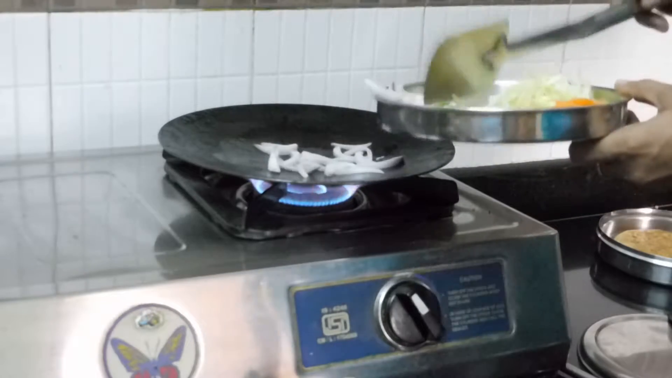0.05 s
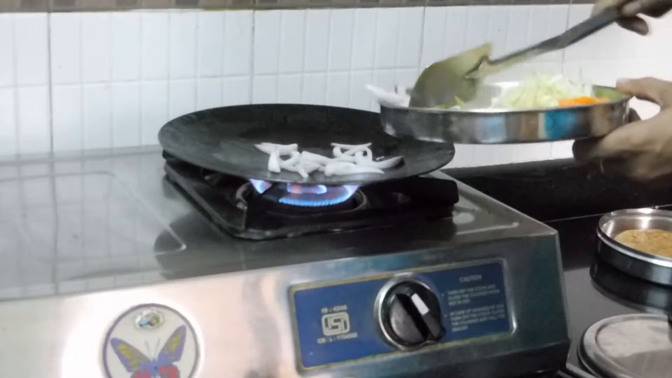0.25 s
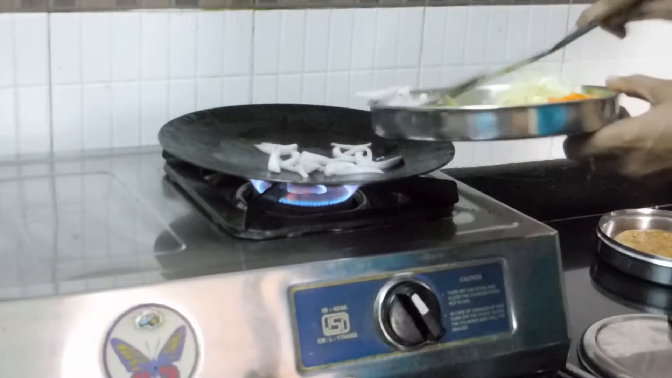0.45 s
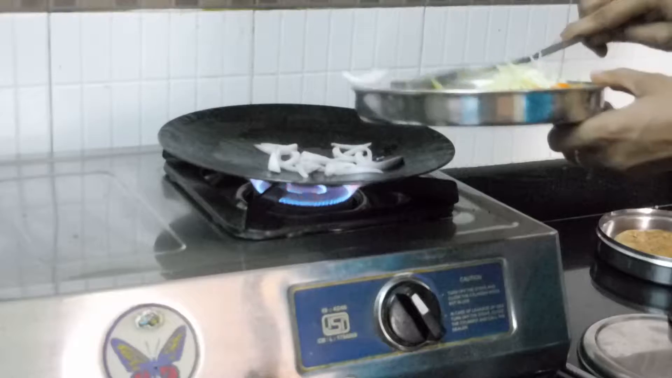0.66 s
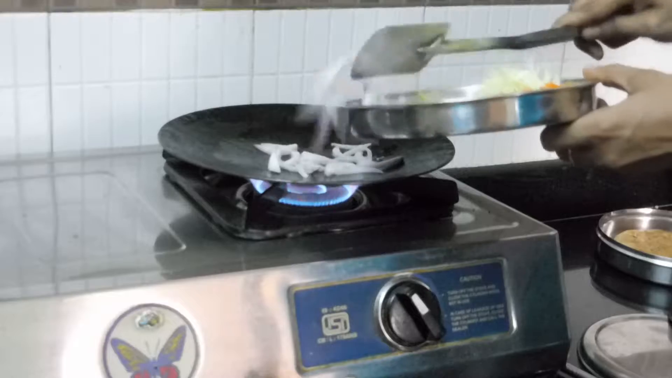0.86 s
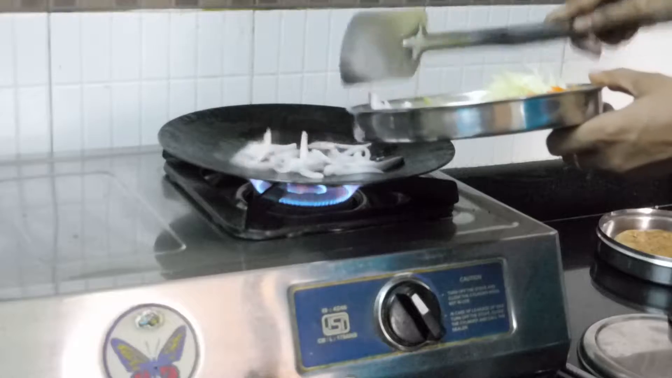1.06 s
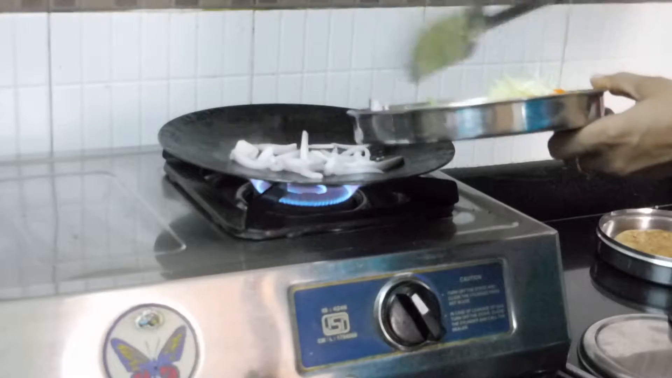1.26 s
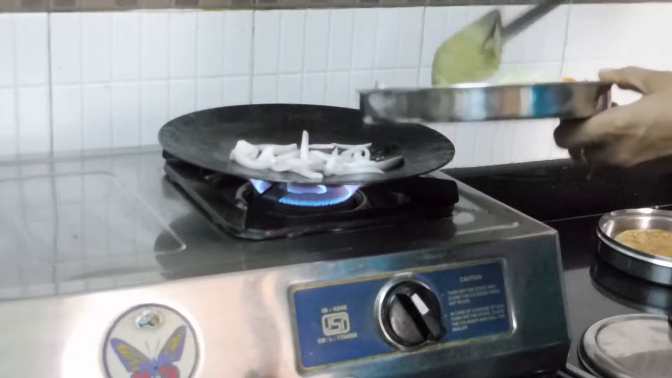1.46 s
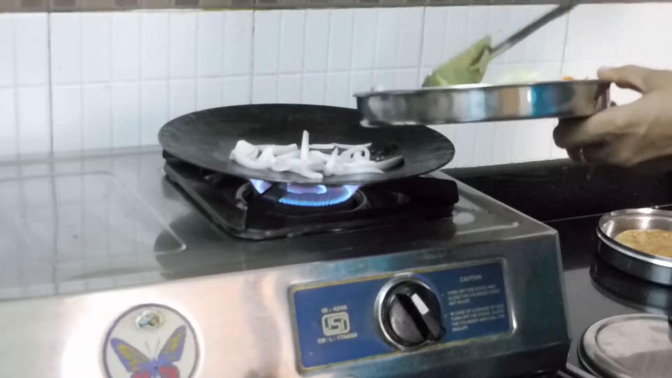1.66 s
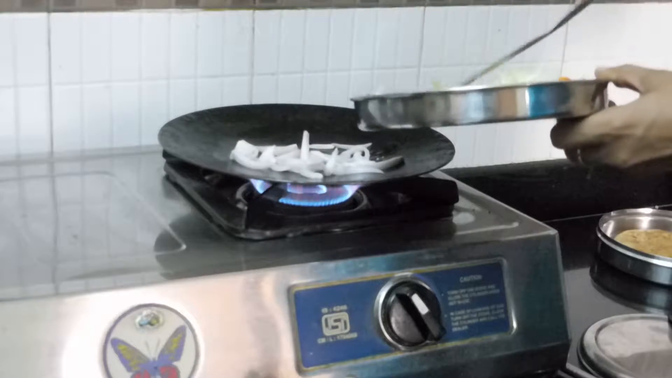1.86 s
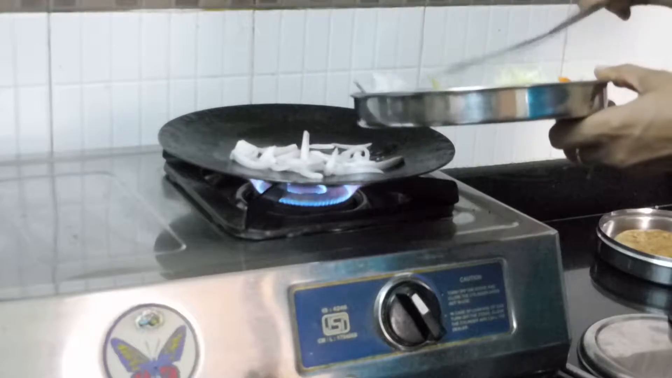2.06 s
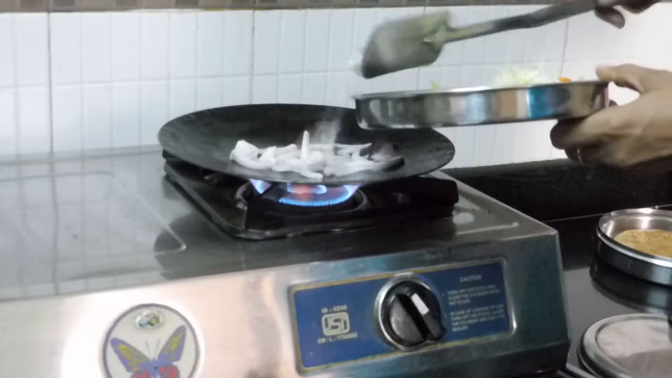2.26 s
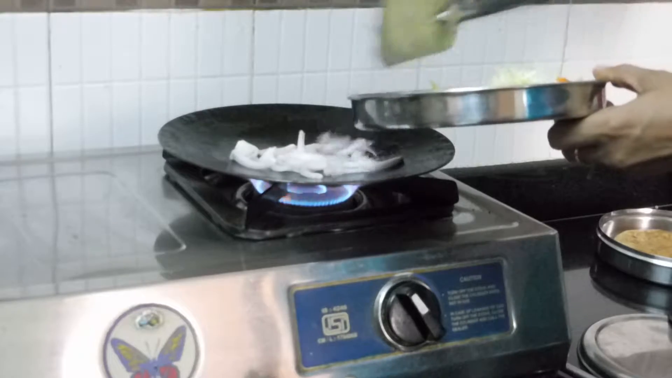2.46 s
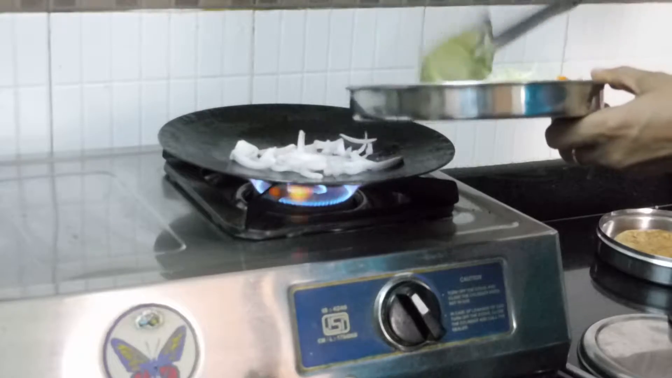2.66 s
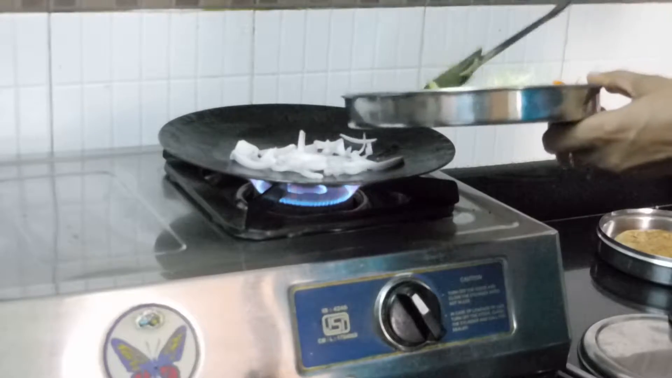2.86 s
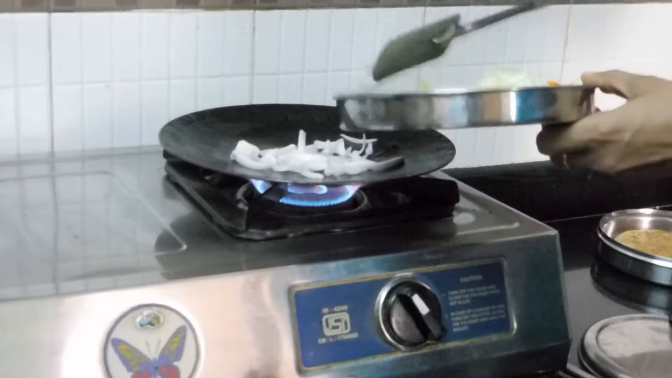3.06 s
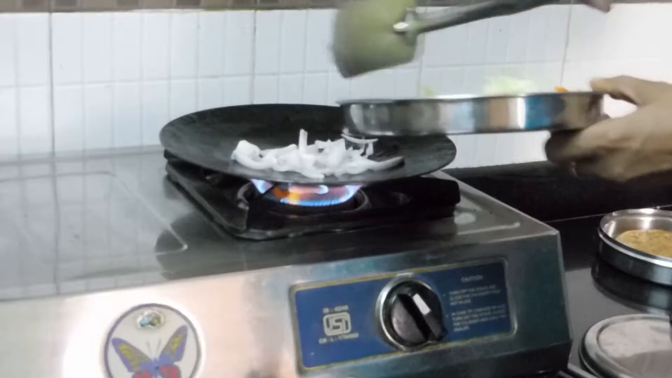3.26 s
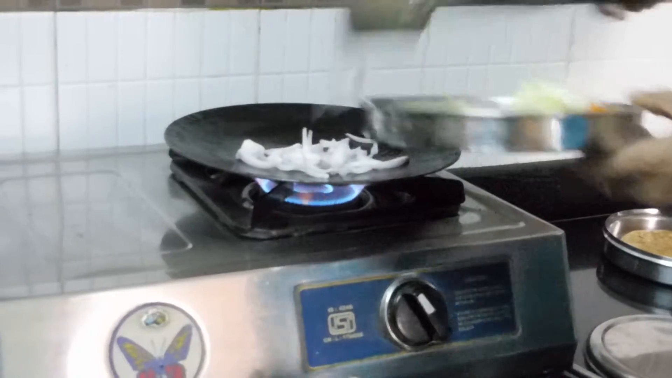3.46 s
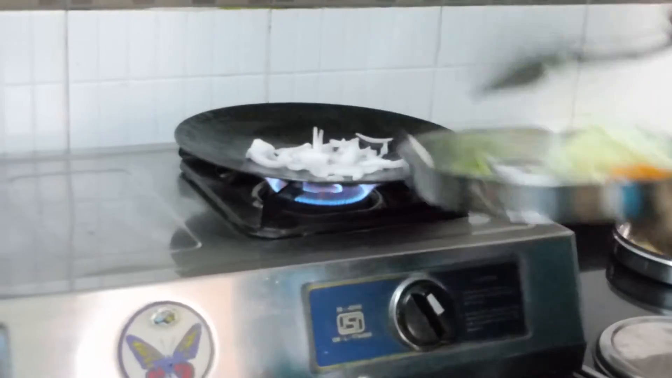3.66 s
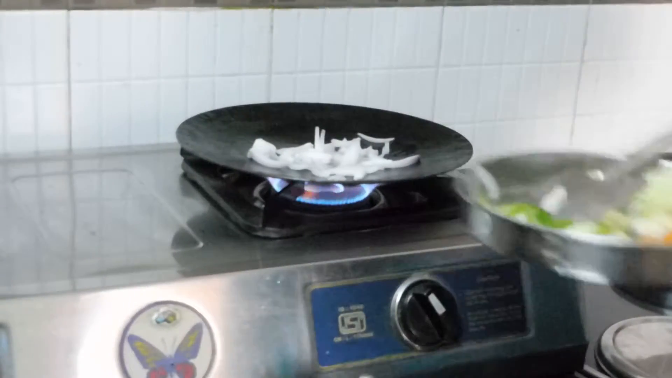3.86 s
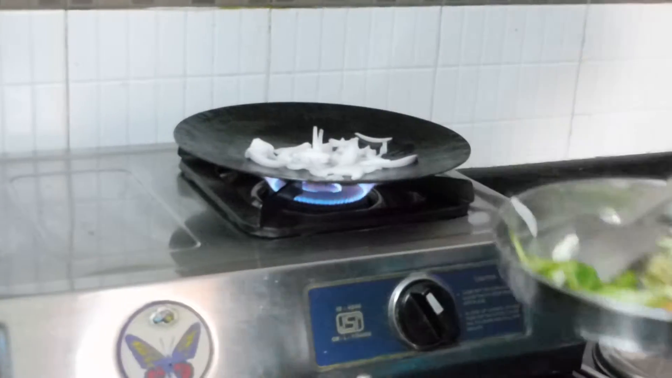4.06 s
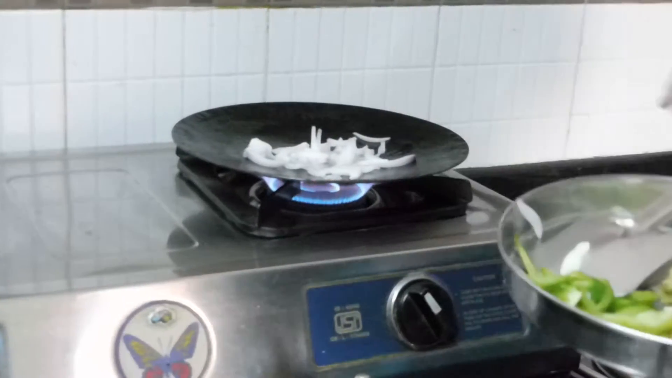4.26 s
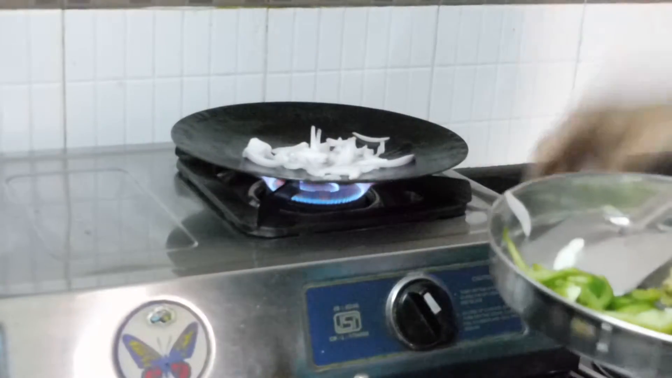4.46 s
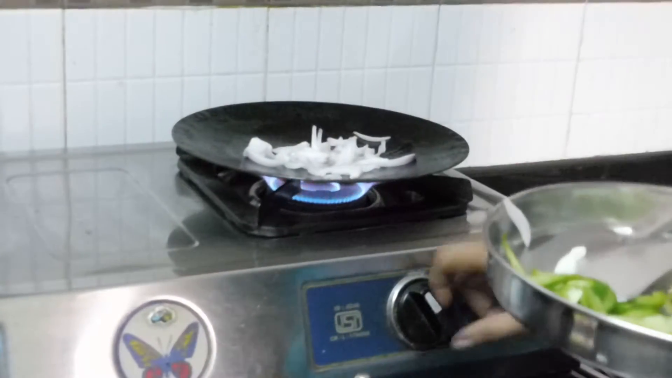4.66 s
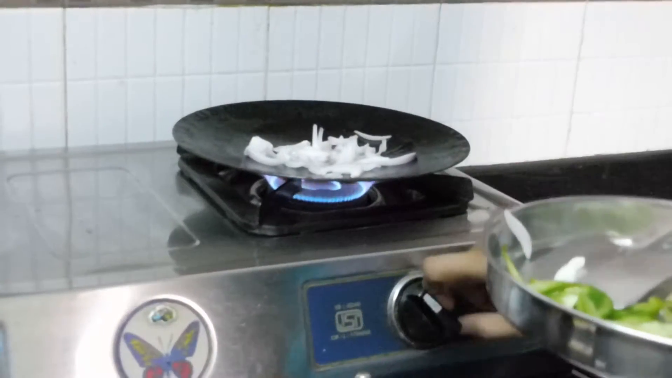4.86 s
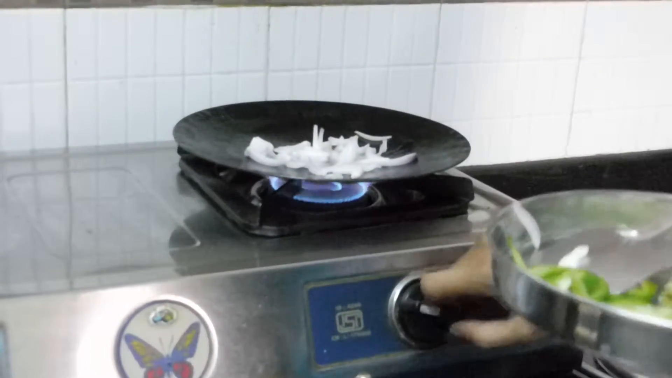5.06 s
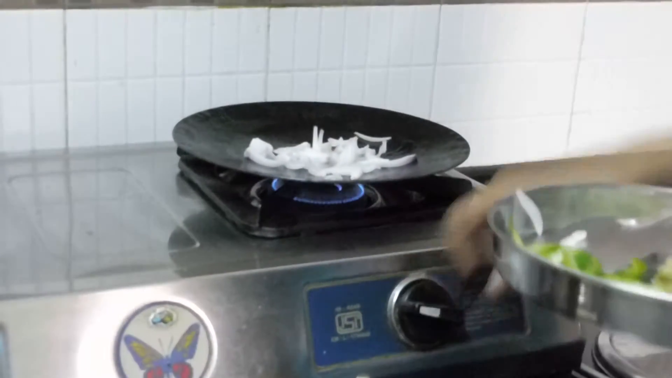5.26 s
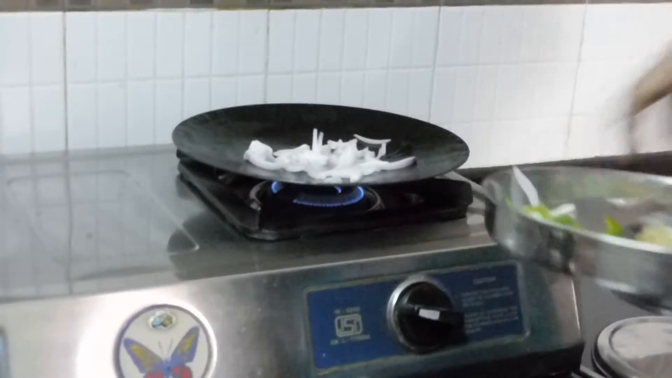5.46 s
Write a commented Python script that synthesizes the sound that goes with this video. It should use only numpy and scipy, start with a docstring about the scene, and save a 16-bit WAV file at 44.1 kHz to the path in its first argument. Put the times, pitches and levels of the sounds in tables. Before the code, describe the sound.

A close stereo view of frying in a small tiled kitchen. It begins with a light, fine sizzle, a soft spatula rustle near 0.1 s and a cluster of crisp popping drops from 0.3 to 1.1 s. At about 1.0 s the onion makes the sizzle leap into a dense, bright hiss, strong until 1.7 s. A crunchy scoop and dull tray knocks come near 1.5 s. From 1.9 s wet slices crack and spit sharply, with another surge around 2.6 s and many hard pops until 3.7 s. A steel tray clacks at 3.8-3.9 s as shreds rustle. The sizzle then fluctuates, thinner around 5.1 s, with scattered snaps and a spit at 5.35 s. Faint throaty dove coos come from outside at 1.7-2.4 and 3.7-4.2 s. A very quiet gas murmur and barely audible low bumps lie underneath.

```python
"""Sizzling oil on a flat iron pan takes sliced onion pushed off a steel tray, over a gas ring in a tiled kitchen.
The sizzle is dense random bubble bursts; drops pop with click, tear and ring; wet slices crack, spray and slap.
The spatula rustles in shredded vegetables as filtered grains and knocks the tray's decaying modes.
A dove outside coos in two calls of gliding sines, shaped noise makes the flame's murmur, and low thuds bump."""
import sys
import numpy as np
from scipy import signal
from scipy.fft import rfft, irfft, next_fast_len
from scipy.io import wavfile
from scipy.ndimage import uniform_filter1d, minimum_filter1d

SR = 44100
rng = np.random.default_rng(int(sys.argv[2]) if len(sys.argv) > 2 else 0)


def transcribe(signal):
    """Save signal, clipped to [-1, 1], as a 16-bit WAV file at the path in sys.argv[1]."""
    frames = np.atleast_2d(signal).T
    limited = np.clip(frames, -1, 1)
    pcm = np.round(limited * 32767).astype(np.int16)
    wavfile.write(sys.argv[1], SR, pcm)


N = 243431
TIME = np.arange(N) / SR
SPOTS = 14  # places on the pan, each with its own path through the kitchen

# All levels are relative, ahead of layer gains and room.
# vigour of the frying: start_s, fine_sizzle_db, coarse_bubbling_db
FRYING_VIGOUR = [(0.0, -29.5, -48.5), (0.17, -32.5, -50.5), (0.45, -33.5, -49.5), (0.73, -32, -44),
                 (0.79, -33.5, -53), (0.89, -31, -45), (0.97, -28.5, -53), (1.04, -20, -39),
                 (1.08, -21, -42), (1.2, -20, -34.5), (1.3, -22, -50), (1.4, -21.5, -43), (1.6, -22, -47),
                 (1.85, -26.5, -43.5), (2.0, -27.5, -49), (2.32, -26.5, -49.5), (2.64, -22, -38),
                 (2.9, -27, -47), (3.22, -27.5, -43), (3.44, -26, -46), (3.69, -29.5, -47),
                 (4.03, -27, -41), (4.13, -31, -48), (4.21, -30, -46), (4.46, -27, -49.5),
                 (4.66, -31, -50.5), (5.08, -35, -48), (5.52, -29, -51)]
# the loudest single drops popping: start_s, level_db, cavity_pitch_hz, dull_tap_on_iron_db
POPPING_DROPS = [(0.0566, -25, 11000, -47), (0.33, -19, 11000, -53), (0.3324, -10, 6200, -52),
                 (0.3434, -6, 11500, -37), (0.3678, -16, 12000, -42), (0.416, -21, 7650, -63),
                 (0.4831, -19, 5870, -57), (0.5584, -8, 10700, -37), (0.6076, -14, 9400, -54),
                 (0.669, -14, 10000, -50), (0.6931, -5.5, 11800, -32.5), (0.712, -19, 9450, -42),
                 (0.816, -11, 7850, -53), (0.8172, -4.5, 10900, -38), (0.8659, -17, 8000, -56),
                 (0.8988, -12, 4730, -56), (0.9117, -8, 11500, -52), (0.9614, -4, 10000, -54),
                 (1.033, -3, 7300, -28.5), (1.0824, -1, 10900, -34), (1.943, -1.5, 10500, -57),
                 (1.96, -11, 11500, -52), (2.156, -9, 11500, -54), (2.2, -4, 9500, -52),
                 (2.391, -3, 10800, -35), (2.7814, -1, 10400, -46), (2.93, -3, 10800, -40),
                 (2.961, -4, 10100, -44), (3.0297, 0, 12100, -50), (3.0614, -4, 10600, -56),
                 (3.1296, -6.5, 11000, -32), (3.3024, -10, 11300, -57), (3.3624, -3, 10100, -31),
                 (3.5933, -4.5, 9900, -59), (3.6935, -6, 11500, -50), (4.1585, -17, 8000, -37),
                 (4.2823, -0.5, 11500, -40), (4.4028, -11, 11300, -50), (4.785, -18, 9400, -56),
                 (4.8421, -10, 11000, -53), (4.9642, -21.5, 10800, -60), (4.9852, -20, 9500, -52),
                 (5.1173, -13, 10800, -47), (5.269, -23, 11400, -57)]
# water flashing to steam: start_s, crack_db, spray_db, spray_length_s, slap_on_iron_db, coarse_splutter_db
STEAM_SPITS = [(0.344, -32, -36, 0.025, -42, -42), (0.481, -20, -31, 0.028, -60, -35),
               (0.913, -18, -38, 0.014, -45, -31.5), (1.385, -20.5, -18, 0.01, -40.5, -51),
               (1.449, -23, -20, 0.012, -63, -55), (1.901, -5, -26, 0.032, -44, -33.5),
               (1.959, -28, -19, 0.021, -55, -51), (2.0598, -11.5, -22, 0.026, -35.5, -32),
               (2.2396, -4, -32, 0.032, -32.5, -35), (2.4255, -4, -16, 0.034, -33.5, -36),
               (2.619, -13, -18, 0.017, -36, -39), (2.763, -8.5, -19, 0.021, -34, -36),
               (3.172, -7, -23.5, 0.05, -48, -47), (3.494, -15, -24, 0.045, -36, -36),
               (3.5358, -8, -10.5, 0.02, -32, -52), (3.998, -22, -22, 0.032, -54, -42),
               (4.159, -16, -26, 0.032, -42, -43), (4.3115, -15, -27, 0.034, -39, -33),
               (4.845, -36, -28.5, 0.037, -45, -57), (5.352, -8.5, -19.5, 0.038, -35, -43)]
# the iron pan's ringing modes: pitch_hz, level_db, t60_s
PAN_MODES = [(366, -62, .4), (698, -60, .3), (869, -58, .4), (1110, -54, .25), (1326, -57, .2),
             (2662, -57, .4), (3222, -60, .25), (4009, -59, .25)]
# spatula strokes through the shredded vegetables: middle_s, level_db, half_length_s
SPATULA_STROKES = [(.14, -31.5, 0.089), (1.53, -25, 0.048), (2.69, -47, 0.032), (3.965, -21, 0.1)]
# spatula and tray knocking: start_s, level_db, brightness_hz, scrape_length_s, scrape_db, place (0 floor to 1 rim)
TRAY_KNOCKS = [(0.087, -40, 1500, 0.041, -4, 0), (1.475, -28.5, 1550, 0.042, 0.5, 0.055),
               (1.567, -35.5, 1300, 0.011, -5, 0.3), (1.67, -37, 2200, 0.023, -3, 0.52),
               (2.618, -41, 2500, 0.02, 4.5, 0.14), (2.654, -40.5, 2440, 0.018, 4, 0.1),
               (2.764, -37.5, 2700, 0.054, -2, 0.45), (3.174, -42.5, 2520, 0.017, -15, 0.39),
               (3.494, -41, 2400, 0.019, 8, 0.55), (3.8238, -31.5, 4600, 0.0055, -4, 1),
               (3.8816, -35, 4770, 0.0041, -1, 0.72), (3.949, -37, 3000, 0.043, -3, .6)]
# modes of the loaded steel tray, the dB columns weighted by place: pitch_hz, floor_db, rim_db, t60_s
TRAY_MODES = [(262, -9.5, -22, 0.14), (695, -17, 8, 0.08), (807, -8, -20, .1), (900, -10, -20, 0.08),
              (1055, -5, -14, .1), (1130, -9, -2, 0.08), (1293, -12, 1, 0.05), (1739, -4, -10, 0.055),
              (1890, -6, -3, 0.06), (2227, -2, -6, 0.035), (2600, 3, -4, 0.06), (2848, 1, 0, 0.05),
              (3098, 3, -1, 0.035), (3550, 3, 5, 0.03), (3680, 3, 4, .035), (4050, 4, 1, .03),
              (4400, 3, 3, .035), (5000, 3, 3, .025), (5470, 3, 3, .035), (6110, 2, 0, .025),
              (6966, 3, 4, 0.025), (11200, 17, 17, 0.03)]
# the dove's notes: start_s, length_s, pitch_hz, level_db, octave_db, throatiness (0 to 1)
DOVE_NOTES = [(1.728, .17, 532, -48, -16, .9), (2.075, .18, 563, -44, -13, .8),
              (2.275, .155, 570, -47.5, -17, .6), (3.728, .18, 558, -45.5, -8, .75),
              (4.02, .14, 581, -39.5, -22, .2)]
# dull bumps of tray and gas knob: middle_s, level_db, half_length_s
DULL_BUMPS = [(3.607, -60, 0.079), (5.085, -53.5, 0.046), (5.257, -62, 0.048)]
# spectrum of fine bursting bubbles and droplets: frequency_hz, density_db (per Hz)
SIZZLE_SPECTRUM = [(150, -25.5), (500, -41.5), (1200, -24.5), (2500, -17), (4500, -11), (7000, -5.5),
                   (9500, 0), (11500, 3), (13500, 0.5), (15800, -9.5)]
# spectrum of coarse bubbling beneath the slices: frequency_hz, density_db (per Hz)
BUBBLING_SPECTRUM = [(150, -18), (400, -12.5), (800, -12), (1400, -5.5), (2200, -2.5), (3300, -3.5),
                     (5000, 3), (9000, -13.5), (15000, -38)]
# spectrum of a water pocket cracking open: frequency_hz, density_db (per Hz)
CRACK_SPECTRUM = [(100, -21), (400, -18.5), (1000, -18.5), (2500, -3.5), (5000, 1.5), (10500, 4.5),
                  (13000, -0.5), (16000, 1)]
# spectrum of a popping drop: frequency_hz, density_db (per Hz)
POP_SPECTRUM = [(100, -9.5), (500, -15.5), (1500, -12), (3500, -1.5), (7000, 5), (11000, 8.5), (13500, 6.5),
                (16000, 7)]
# spectrum of crisp shreds rustling: frequency_hz, density_db (per Hz)
RUSTLE_SPECTRUM = [(150, -17.5), (800, -15), (2500, -4), (5000, -2.5), (11000, 5), (16000, 2.5)]
# spectrum of the gas flame: frequency_hz, density_db (per Hz)
FLAME_SPECTRUM = [(20, 1), (50, -7), (75, -7.5), (98, -1.5), (130, -10.5), (250, -6.5), (400, -3.5),
                  (800, -6.5), (1200, -6), (3000, -61), (8000, -43)]
# colour between the microphones, left fuller in bass and top: frequency_hz, left_minus_right_db
EAR_DIFFERENCE = [(50, 3), (300, -.5), (4000, -1.3), (9500, -0.7), (13500, 1.1)]


def sizzle(fine_gain_db=0.65, coarse_gain_db=0.94):
    """Fine bursts at the rim of each slice, coarser bubbling trapped beneath; both come in flurries."""
    fine_db, coarse_db = in_time(FRYING_VIGOUR)
    flurry_db = 1.3 * drift(rate=50)
    fine = colour(bursts(grains(per_s=5500, spread_db=4.0), cycles=2.2), SIZZLE_SPECTRUM)
    coarse = colour(deal(grains(per_s=2500, spread_db=3.0)), BUBBLING_SPECTRUM)
    fine_level = from_db(fine_db + flurry_db + fine_gain_db)
    coarse_level = from_db(coarse_db + flurry_db + coarse_gain_db)
    return fine_level * fine + coarse_level * coarse


def bursts(clicks, cycles):
    """Bubbles ring for a few cycles at the pitch of their spot; the spots sum to unit power."""
    pitches_hz = np.linspace(2500, 15000, SPOTS)
    rings = [ring(row, hz, cycles / hz) for row, hz in zip(deal(clicks), pitches_hz)]
    return rms_one(np.array(rings)) / np.sqrt(SPOTS)


def crackle(per_s=60, level_db=-11.0, spread_db=4.0, follows=0.65):
    """Stray droplets snap on the bare iron, harder as the frying grows."""
    vigour_db, _ = in_time(FRYING_VIGOUR)
    swing_db = follows * (vigour_db - vigour_db.mean())
    sizes = from_db(level_db + swing_db + spread_db * rng.standard_normal(N))
    sizes = sizes * rng.choice([-1, 1], N)
    snaps = sizes * (rng.random(N) < per_s / SR)
    return colour(deal(snaps), SIZZLE_SPECTRUM)


def pops(gain_db=8.5, ring_share=1.0, cycles=7.0, tear_share=0.2, tear_s=0.00068, size=512):
    """A drop bursts with a sharp click, its skin tears for a millisecond and its cavity rings briefly."""
    out, age = np.zeros((SPOTS, N)), np.arange(size) / SR
    for k, (s, db, hz, _) in enumerate(POPPING_DROPS):
        tear = tear_share * rng.standard_normal(size) * np.exp(-age / tear_s)
        cavity = ring_share * np.cos(2 * np.pi * hz * age) * from_db(-60 * age * hz / cycles)
        start = round(s * SR)
        out[k % SPOTS, start:start + size] += from_db(db + gain_db) * ((age == 0) + tear + cavity)
    return colour(out, POP_SPECTRUM)


def cracks(tear_share=0.12, tear_s=0.00088, gain_db=19.5):
    """A pocket of water tears open with a full-range crack."""
    out, tear = np.zeros((SPOTS, N)), tear_share * rng.standard_normal(N)
    for k, (s, db, *_) in enumerate(STEAM_SPITS):
        out[k % SPOTS] += from_db(db + gain_db) * (click(s) + tear * fade(s, tear_s))
    return colour(out, CRACK_SPECTRUM)


def sprays():
    """Each crack throws a dying spray of droplets over the iron while the slice splutters coarsely beneath."""
    spray, splutter = 0, 0
    for s, _, spray_db, length, _, splutter_db in STEAM_SPITS:
        dying = fade(s, length)
        spray = spray + from_db(spray_db) * dying
        splutter = splutter + from_db(splutter_db) * dying
    droplets = colour(deal(grains(per_s=7000, spread_db=3.5)), SIZZLE_SPECTRUM)
    bubbles = colour(deal(grains(per_s=2500, spread_db=3.0)), BUBBLING_SPECTRUM)
    return spray * droplets + splutter * bubbles


def taps(gain_db=30, top_hz=2200, slap_s=0.0047, slap_smear=0.056):
    """Popping drops tap the iron dully; spitting slices slap it, landing over a few milliseconds."""
    smear = slap_smear * rng.standard_normal(N)
    blows = sum(from_db(db) * click(s) for s, *_, db in POPPING_DROPS)
    blows += sum(from_db(db) * (click(s) + smear * fade(s, slap_s)) for s, *_, db, _ in STEAM_SPITS)
    return from_db(gain_db) * band(blows + 1e-18, 200, top_hz)


def pan(frying):
    """The frying shakes the iron plate into a faint ring."""
    return sum(from_db(db) * ring(frying, hz, t60) for hz, db, t60 in PAN_MODES)


def scoops():
    """Crisp shreds crunch and slip under each stroke of the spatula."""
    return swells(SPATULA_STROKES) * colour(grains(per_s=4500, spread_db=6.0), RUSTLE_SPECTRUM)


def tray(clack_db=26, ring_db=5.5):
    """Knocks and slips clack and ring the tray's modes; soft contacts favour low modes, hard ones high."""
    slips = grains(per_s=2000, spread_db=2.0)
    contacts = []
    for s, db, _, length, scrape_db, _ in TRAY_KNOCKS:
        scrape = from_db(scrape_db) * slips * fade(s, length) / np.sqrt(length * SR)
        contacts.append(from_db(db) * (click(s) + scrape))
    contacts = np.array(contacts)
    bright_hz, rim = np.array(TRAY_KNOCKS)[:, 2], np.array(TRAY_KNOCKS)[:, -1]
    # the dry clack of the contact itself, under the ring
    clacks = sum(band(contact + 1e-18, hz / 3, hz) for contact, hz in zip(contacts, bright_hz))
    out = from_db(clack_db) * clacks
    for hz, floor_db, rim_db, t60 in TRAY_MODES:
        reach = 1 / np.hypot(1, (hz / bright_hz) ** 2) / np.hypot(1, bright_hz / (2.6 * hz))
        place_db = (1.5 - rim) * floor_db + rim * rim_db
        chance_db = rng.standard_normal(len(TRAY_KNOCKS))
        strength = reach * from_db(ring_db + place_db + chance_db)
        signs = rng.choice([-1, 1], len(TRAY_KNOCKS))
        out += ring((strength * signs) @ contacts, hz, t60)
    return out


def dove(flutter=0.4, throb_hz=21, throb=.55, burr_hz=75, burr=.55):
    """Coos that rise and then hold, with a faint octave; the throaty ones throb and burr."""
    start_flat, rise_s = .12, 0.03  # each note starts this share flat and glides up
    attack_s, release_s = 0.048, 0.025
    out = np.zeros(N)
    pulsing = throb * wobble(throb_hz) + burr * wobble(burr_hz)
    waver = flutter * drift(rate=120)
    for s, length, hz, db, octave_db, throaty in DOVE_NOTES:
        age = np.maximum(TIME - s, 0)
        gate = np.clip(np.minimum(age / attack_s, (length - age) / release_s), 0, 1)
        pitch_hz = hz * (1 - start_flat * np.exp(-age / rise_s))
        phase = 2 * np.pi * np.cumsum(pitch_hz) / SR + throaty * waver
        voice = np.sin(phase) + from_db(octave_db) * np.sin(2 * phase)
        out += gate * from_db(db) * (1 + throaty * pulsing) * voice
    return out


def wobble(hz, unevenness=0.154):
    """A nearly regular swing between -1 and 1, its rate drifting."""
    return np.sin(2 * np.pi * np.cumsum(hz * (1 + unevenness * drift(rate=25))) / SR)


def bumps(top_hz=85):
    """Short low thuds carried by the stove top, stronger on the left."""
    thud = rms_one(band(rng.standard_normal(N), 25, top_hz, order=2))
    return thud * swells(DULL_BUMPS) * from_db([[4], [-4]])


def flame(level_db=-59.0):
    """The low, even murmur of the gas ring is shaped noise, widest in the bass."""
    mid, side = colour(rng.standard_normal((2, N)), FLAME_SPECTRUM)
    side = .8 * signal.sosfilt(signal.butter(1, 330, fs=SR, output="sos"), side)
    return from_db(level_db) * (mid + side * [[1], [-1]])


def kitchen(x, near_db, room_db, near_t60=0.0047, room_t60=0.23, travel_s=.0011):
    """Direct sound, quick reflections off pan and tiles, then the room; the two sides part in the treble."""
    t = np.arange(SR // 3) / SR - travel_s
    response = np.zeros((2, len(t)))
    response[:, np.searchsorted(t, 0)] = 1
    for db, t60 in ((near_db, near_t60), (room_db, room_t60)):
        mid, side = rng.standard_normal((2, len(t)))
        side = signal.sosfilt(signal.butter(1, 1800, "high", fs=SR, output="sos"), side)
        tail = (mid + side * [[1], [-1]]) * (t > .0003) * from_db(-60 * np.abs(t) / t60)
        response += from_db(db) * rms_one(tail) / np.sqrt(len(t))
    return convolve(x, rms_one(response) / np.sqrt(len(t)))


def yard(x, echo_db=-9.0, first_echo_s=0.076, t60=0.76):
    """The dove's notes come back off the walls outside as a late, soft tail."""
    t = np.arange(SR // 2) / SR
    tail = rng.standard_normal((2, len(t))) * (t > first_echo_s) * from_db(-60 * t / t60)
    return x + from_db(echo_db) * convolve(x, rms_one(tail) / np.sqrt(len(t)))


def microphones(x):
    """The two sides differ slightly in colour."""
    left, right = ([(hz, sign * db / 2) for hz, db in EAR_DIFFERENCE] for sign in (1, -1))
    return np.array([colour(x[0], left), colour(x[1], right)])


def from_db(db):
    """Decibels to gain."""
    return 10 ** (np.asarray(db) / 20)


def rms_one(x):
    """Scale to unit power."""
    return x / np.sqrt(np.mean(x ** 2) + 1e-20)


def in_time(rows):
    """Each column of a curve, sample by sample."""
    s, *columns = np.transpose(rows)
    return [np.interp(TIME, s, c) for c in columns]


def convolve(x, response):
    """Pass a sound through an impulse response."""
    size = next_fast_len(N + response.shape[-1])
    return irfft(rfft(x, size) * rfft(response, size), size)[..., :N]


def colour(x, spectrum, size=4096):
    """Causal (minimum-phase) filter of unit energy, shaped by the given spectrum."""
    hz, db = np.transpose(spectrum)
    grid_hz = np.maximum(np.arange(size // 2 + 1) * SR / size, 1)
    magnitude = from_db(np.interp(np.log(grid_hz), np.log(hz), db))
    # folding the cepstrum forward puts the energy as early as possible
    cepstrum = irfft(np.log(magnitude))
    cepstrum[1:size // 2] *= 2
    cepstrum[size // 2 + 1:] = 0
    response = irfft(np.exp(rfft(cepstrum)))
    return convolve(x, response / np.linalg.norm(response))


def band(x, low_hz, high_hz, order=1):
    """Keep the range between two frequencies."""
    return signal.sosfilt(signal.butter(order, [low_hz, high_hz], "band", fs=SR, output="sos"), x)


def drift(rate):
    """A random curve of unit power, straight between knots at this rate per second."""
    knots = rng.standard_normal(int(rate * N / SR) + 2)
    return rms_one(np.interp(TIME * rate, np.arange(len(knots)), knots))


def ring(clicks, hz, t60):
    """A unit click sets a decaying cosine of height 1 ringing."""
    r, w = from_db(-60 / (t60 * SR)), 2 * np.pi * hz / SR
    return signal.lfilter([1, -r * np.cos(w)], [1, -2 * r * np.cos(w), r * r], clicks + 1e-18)


def click(s):
    """A unit click at one moment."""
    return 1.0 * (np.arange(N) == round(s * SR))


def fade(s, length):
    """Starts at once, holds briefly and dies."""
    age = np.clip((TIME - s) / length, 0, 10)
    return (TIME >= s) * np.exp(-age ** 3.0 / 2)


def swells(rows):
    """A smooth rise and fall for each row of middle_s, level_db, half_length_s."""
    return sum(from_db(db) * np.exp(-((TIME - s) / length) ** 2) for s, db, length in rows)


def grains(per_s, spread_db):
    """Random clicks, many small and few large; unit power."""
    sizes = from_db(spread_db * np.minimum(rng.exponential(1, N), 6))
    return rms_one(sizes * rng.choice([-1, 1], N) * (rng.random(N) < per_s / SR))


def deal(clicks):
    """Every click happens at one of several spots on the pan; one row a spot."""
    return clicks * (rng.integers(0, SPOTS, N) == np.arange(SPOTS)[:, None])


def scene():
    """Each pan spot has its own path through the kitchen; drops bursting in the open arrive more directly."""
    buried = sizzle() + sprays()
    exposed = crackle() + pops() + cracks()
    frying = sum(kitchen(spot, near_db=-4.5, room_db=3.5) for spot in buried)
    snaps = sum(kitchen(spot, near_db=-7, room_db=-7) for spot in exposed)
    thuds = kitchen(taps(), near_db=-12, room_db=-5)
    metal_dry = tray() + scoops() + pan((buried + exposed).sum(axis=0))
    metal = kitchen(metal_dry, near_db=-10, room_db=-2)
    metal = metal * from_db([[-0.5], [0.5]])  # slightly to the right
    bird = yard(dove())
    return frying + snaps + thuds + metal + bird + flame() + bumps()


def record(dry, ceiling=0.48, size=21, cutoff_hz=15900):
    """A fast limiter, shared by both sides and spanning size samples, ducks sharp peaks; the top is cut."""
    heard = microphones(dry)
    gain = np.minimum(1, ceiling / (np.abs(heard).max(axis=0) + 1e-9))
    limited = heard * uniform_filter1d(minimum_filter1d(gain, size), size)
    return signal.sosfilt(signal.ellip(12, .1, 80, cutoff_hz, fs=SR, output="sos"), limited)


dry = scene()
out = record(dry)
transcribe(out)
```